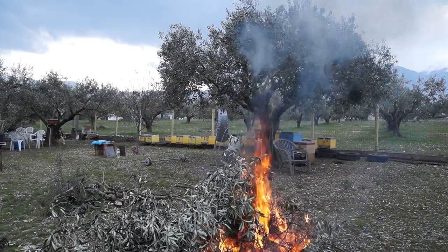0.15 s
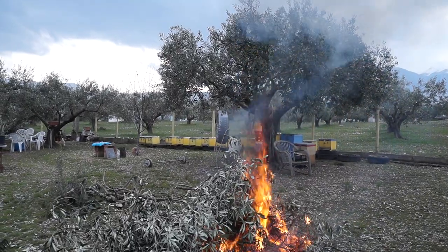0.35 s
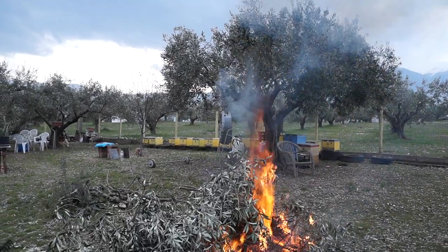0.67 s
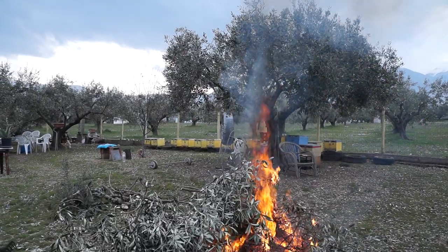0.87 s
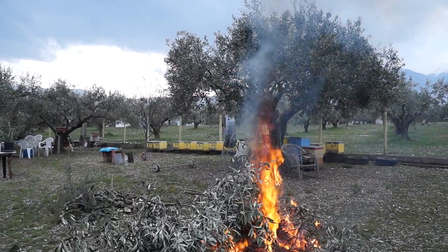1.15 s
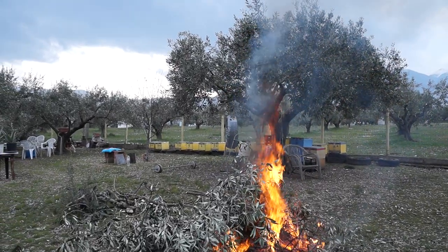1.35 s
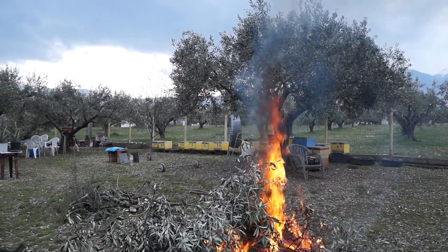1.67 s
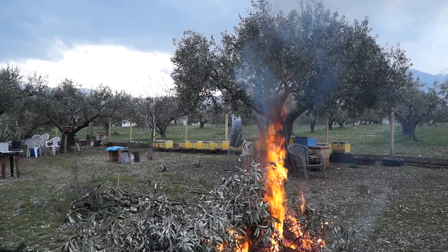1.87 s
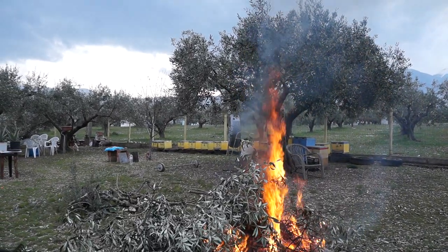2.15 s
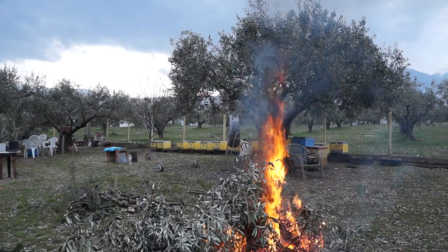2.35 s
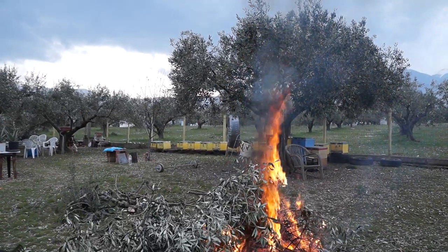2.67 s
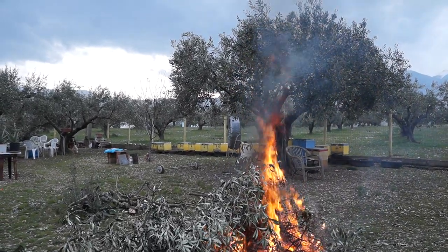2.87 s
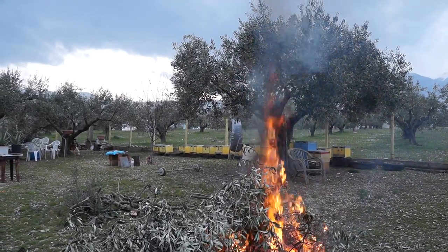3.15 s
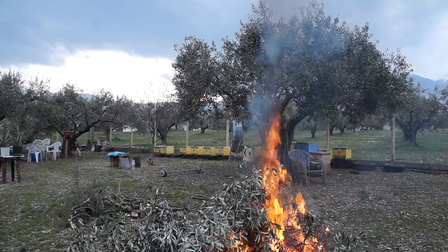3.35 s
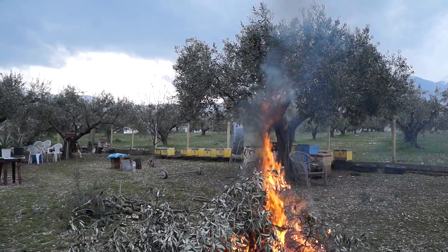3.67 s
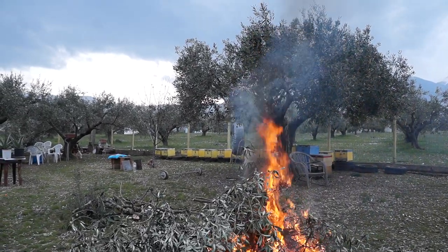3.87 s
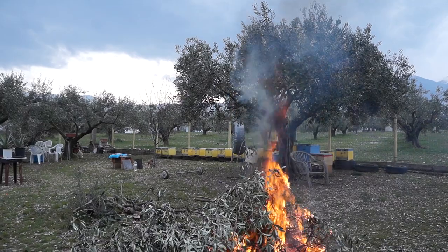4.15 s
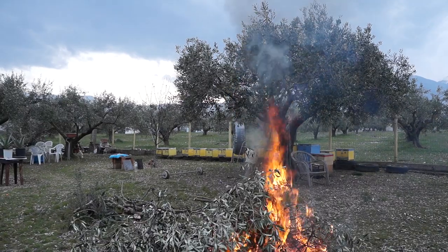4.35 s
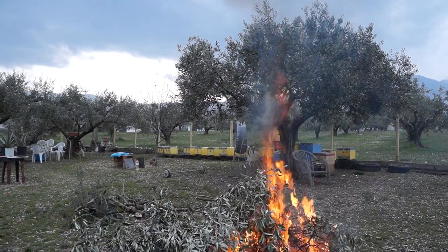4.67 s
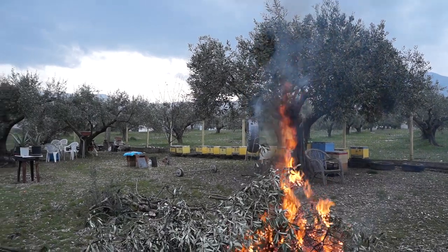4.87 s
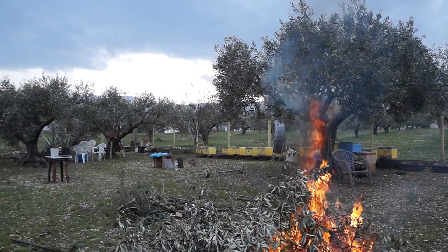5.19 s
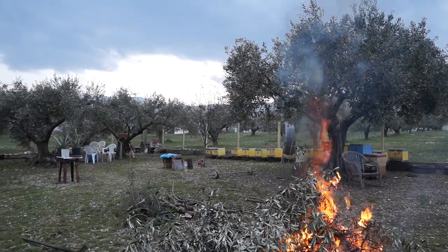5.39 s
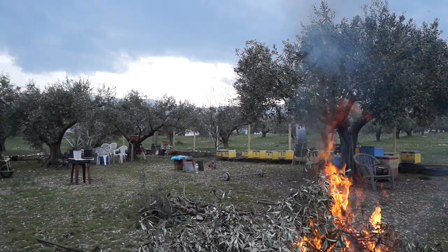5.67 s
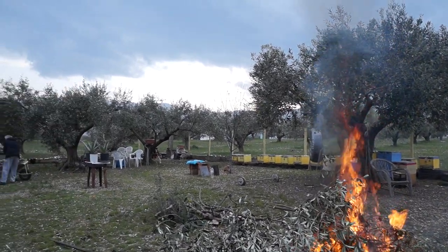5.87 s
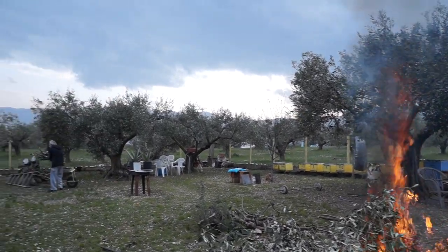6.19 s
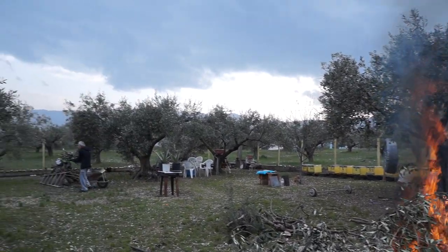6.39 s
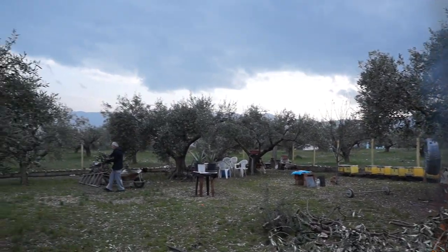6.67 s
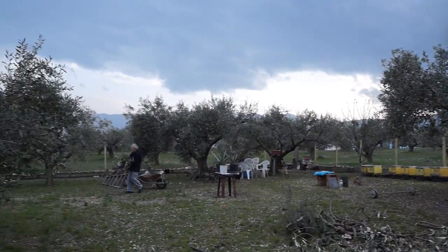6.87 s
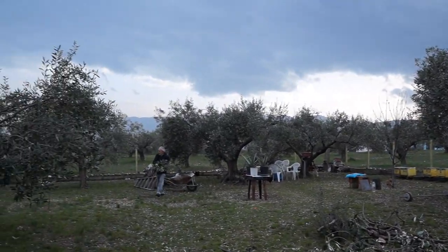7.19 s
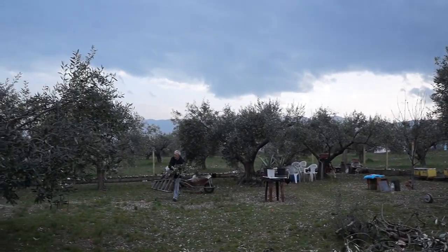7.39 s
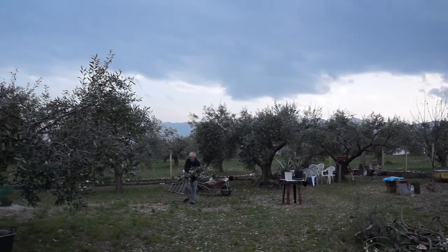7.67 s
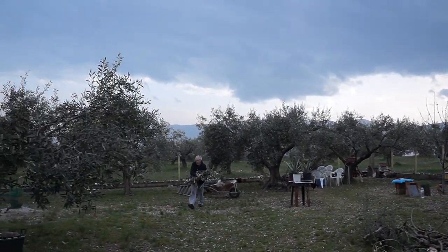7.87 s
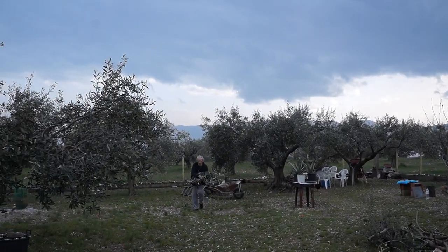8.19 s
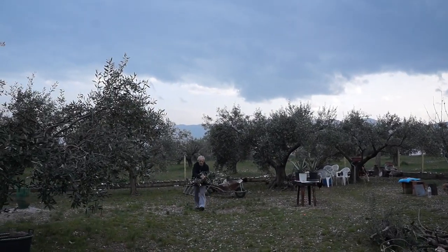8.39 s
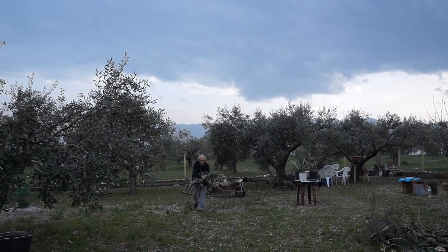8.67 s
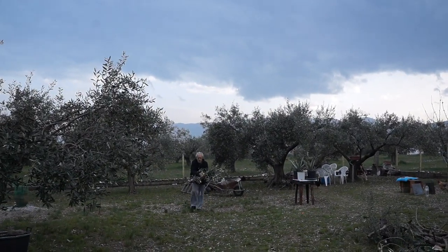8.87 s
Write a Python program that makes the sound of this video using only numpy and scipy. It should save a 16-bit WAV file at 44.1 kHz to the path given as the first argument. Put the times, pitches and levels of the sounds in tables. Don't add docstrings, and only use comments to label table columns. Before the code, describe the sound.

A bonfire of freshly cut leafy branches burns in an orchard, heard in stereo from a few metres away. From 0 to 9 s sharp pops and snaps come irregularly, roughly twenty or more each second, in tight clusters with tiny gaps. Large branch cracks tear on for a few milliseconds, with strong ones near 1.0, 1.7, 2.1, 3.45, 4.4, 5.9, 6.35 and 8.2 s; smaller twigs spit, tick and knock between. Dull thumps fall around 1.45, 4.15, 5.87 and 6.3 s; hollow sticks give very short pitched pings near 1.2, 4.0 and 8.1 s. Behind lies a thin leaf fizz and a faint low roar that swells around 1.5, 4.9 and 7 s. Reflections are brief and diffuse. From about 4 s the sound shifts gently right and the fizz thins as the camera turns left. Tone is bright, ringing near 7.5 kHz, with little above 11 kHz.

```python
import sys
import numpy as np
from scipy import signal
from scipy.fft import rfft, irfft
from scipy.io import wavfile
from scipy.ndimage import uniform_filter1d

SR = 44100
rng = np.random.default_rng(int(sys.argv[2]) if len(sys.argv) > 2 else 0)


def dump(signal):
    limited = np.clip(np.atleast_2d(signal).T, -1, 1)
    pcm = np.round(limited * 32767).astype(np.int16)
    wavfile.write(sys.argv[1], SR, pcm)


def gain_from_db(level_db):
    decades = np.asarray(level_db, float) / 20
    return 10 ** decades


N = 398223

# t/s, energy/dB, woody low part over the crack/dB
LIGHT_TEARS = [(0.14, 1.5, -4), (0.7961, 5, -6.5), (0.9031, 4, -2.5), (1.3627, 5, 3.5), (1.7644, 3, -3.5),
               (1.9188, 1.5, -5), (2.1244, 8.5, -7), (2.1406, 3.5, 0), (2.2759, 8, -3.5),
               (2.5541, 7.0, -5.5), (2.8735, 2.5, -6), (3.0561, 2, -3), (3.2585, 5, -8),
               (3.4556, 4.5, -15), (3.6998, 8.0, -7.5), (3.8728, 4.5, -9.5), (4.4407, 8.5, -16),
               (4.7102, 0.5, -6), (5.0734, 2.5, -2.5), (5.2964, 4.5, -6.5), (5.3492, 5.5, -14),
               (5.5542, 2.5, 2), (5.9615, 7.5, -6.5), (6.0673, 4, -14), (6.1978, 4.5, -1),
               (6.3977, 3.0, -11.5), (6.4621, 5.5, -5), (7.0151, 4, -10), (7.386, 4.5, -9.5),
               (8.7013, 2.5, -12)]
# t/s, energy/dB, woody part/dB
SHARP_BREAKS = [(0.1219, 3.0, -7), (0.3183, 2, -2), (0.3734, 6.5, -5), (0.5923, 7.5, -5), (0.9204, 7, 3),
                (1.1778, 6, -3), (1.2849, 3.5, -8.5), (2.5729, 2.5, -8), (2.6639, 5.5, -3.5),
                (2.8818, 4.0, -9), (3.1103, 3.5, -34), (3.9402, 3, -3), (3.9921, 4.5, -5), (4.0036, 2.5, -10),
                (4.0836, 3.5, -5.5), (4.253, 4, -4), (4.2955, 7.5, -11.5), (5.1809, 5.5, -4),
                (5.2212, 3.5, -4.5), (5.2612, 4, -4), (5.5676, 3, -8), (5.8765, 2, 1), (5.927, 7.5, -6.5),
                (6.3463, 8.5, -7.5), (7.672, 4, -6), (7.7231, 7, 1), (7.8362, 5, -15), (8.2341, 8, -7),
                (8.3711, 5, -9.5), (8.636, 3.5, -8.5)]
# t/s, energy/dB, woody part/dB
RIPS = [(0.0456, 5, -2), (0.3937, 6.0, -4.5), (0.9942, 3.5, -8), (1.0301, 8.5, -9), (1.0716, 2.5, -28),
        (1.6994, 9.5, -12), (1.9315, 3.0, -14), (2.0423, 6.5, -9), (2.9615, 5, -9), (3.1038, 5, -7.5),
        (3.1331, 3.0, -6), (3.4465, 8.5, -8.5), (4.1544, 4, -7), (4.1876, 5, -10), (4.4009, 3, -5),
        (4.9475, 5.5, -7), (5.1483, 5, -5.5), (5.4451, 5, -7.5), (5.5307, 5.5, -9), (5.6585, 3.5, -12),
        (5.6771, 6.5, -6), (5.732, 6, -10), (5.9554, 2.5, -4), (6.5367, 5.5, -7), (6.7098, 3.5, -17),
        (6.9107, 4.5, -8), (7.0529, 2.0, -8.5), (7.0744, 4, -9.5), (8.792, 2.5, -6), (8.9903, 4.5, -8)]
# t/s, energy/dB
TWIG_CRACKS = [(0.1532, -16), (0.4022, -5), (1.7296, 0.5), (2.0498, -8), (2.0722, 0), (2.2042, -4.5),
               (2.4492, 1), (2.6041, -3.5), (3.1981, -4.5), (4.2183, -3), (4.471, -14), (5.5613, -7),
               (5.7743, -4), (5.8429, -2.5), (6.2114, 0), (6.3173, -2), (6.4222, -2), (6.572, 0),
               (7.0456, -9), (7.4335, 2), (7.4417, -2.5), (7.7023, -14), (7.9411, 1.5), (7.9717, -8),
               (8.0056, -0.5), (8.2476, 1), (8.3504, 1), (8.5932, 0.5), (8.8202, -2.5), (8.9429, -2.5)]
# t/s, energy/dB
TWIG_POPS = [(0.0939, -0.5), (0.773, -3.5), (1.0602, -1), (1.2078, -1.5), (1.4297, -4.0), (1.5812, -10),
             (2.1065, -7), (2.1829, -3.0), (2.2344, -5), (2.2876, -1), (2.4775, -3), (2.8421, -5.5),
             (3.5187, -2), (3.5616, 1), (3.6433, -4.5), (3.9097, 0.0), (4.3771, -6), (4.4838, -1.0),
             (6.1545, 0.5), (6.5538, -7), (6.9679, -9), (7.1044, -3.5), (7.352, 2.5), (7.6144, 2.5),
             (7.6396, 0.5), (7.947, 0), (8.7072, 1.5), (8.7292, -1), (8.8702, -4.5), (8.9638, 0.0)]
# t/s, energy/dB
TWIG_SNAPS = [(0.6299, -4.5), (0.8384, -4.5), (0.8916, 1.5), (1.7411, -6), (1.9734, 0), (2.2595, 0.5),
              (2.5851, -8), (2.8688, -2), (3.1185, -14), (3.3347, -1.0), (3.3998, -6), (4.6442, -5.5),
              (4.9722, -3), (5.0991, -1.5), (5.3102, 1.5), (5.4919, -1), (5.6144, -6), (5.7076, -4.0),
              (5.7631, -4.5), (6.0544, -2), (6.098, -11), (6.1307, 0.5), (6.2414, -14), (7.28, -6.5),
              (7.3201, -5.5), (7.6594, -2.0), (8.1024, 0.5), (8.5142, -3.5), (8.5246, -2), (8.766, 1)]
# t/s, energy/dB
TWIG_KNOCKS = [(0.3054, 1), (0.4456, -1.5), (0.5091, -0.5), (0.7092, 1), (0.7894, -11), (1.1629, -5.0),
               (1.2152, 0.5), (1.4453, 1.5), (1.5528, 0.5), (1.6232, 0.5), (1.8829, -0.5), (2.6794, -2.5),
               (2.9304, -4), (2.9993, 4), (3.0977, -4.5), (3.5012, 0), (3.8534, -2.5), (4.0953, -10),
               (4.5561, -10), (4.6581, -5.5), (4.7547, -6.5), (4.8209, -3.5), (5.1725, -1), (5.5998, 1),
               (5.8654, -0.5), (7.5842, 0.5), (7.7536, -1.5), (8.3045, -1), (8.3193, -4), (8.6137, -4.5)]
# events, tearing tail over the shock/dB
BRANCHES = [(LIGHT_TEARS, -5), (SHARP_BREAKS, -7), (RIPS, 2.1)]
# events, woody part over the crack/dB
TWIGS = [(TWIG_CRACKS, -13.5), (TWIG_POPS, -8.5), (TWIG_SNAPS, -5.5), (TWIG_KNOCKS, -1.6)]


def table(rows):
    s, *columns = np.transpose(rows)
    return [np.interp(np.arange(N) / SR, s, column) for column in columns]


def colour(x, points, size=8192):
    hz, db = np.transpose(points)
    bin_hz = np.arange(1, size // 2 + 2) * SR / size
    log_gain = np.log(gain_from_db(np.interp(np.log(bin_hz), np.log(hz), db)))
    cepstrum = irfft(log_gain)
    cepstrum[1:size // 2] *= 2
    cepstrum[size // 2 + 1:] = 0
    response = irfft(np.exp(rfft(cepstrum)))
    response = response / np.linalg.norm(response)
    return signal.oaconvolve(x, response[None], axes=1)[:, :N]


def unit(x):
    return x / np.sqrt(np.mean(x ** 2))


def walk(rate):
    hold = int(SR / rate)
    levels = rng.standard_normal(400)[:N // hold + 1]
    steps = np.repeat(levels, hold)[:N]
    return unit(uniform_filter1d(uniform_filter1d(steps, hold), hold))


def stereo_noise(side_db):
    mid, side = rng.standard_normal((2, N))
    return mid + gain_from_db(side_db) * side * np.array([[1], [-1]])


def bursts(s, db, pan_db, shape):
    lag_s = pan_db * 1.6e-6
    out = []
    for side in (1, -1):
        start = np.clip(np.round((s - side * lag_s / 2) * SR).astype(int), 0, N)
        place = start[:, None] + np.arange(shape.shape[1])
        gain = gain_from_db(db + side * pan_db / 2)[:, None]
        laid = np.bincount(place.ravel(), (shape * gain).ravel(), N + shape.shape[1])
        out.append(laid[:N])
    return np.array(out)


def tearing(tear_db, tear_ms, size=384):
    t = np.arange(size) / SR
    chance = rng.standard_normal((len(tear_db), size + 1))
    decay_ms = tear_ms * np.exp(0.3 * chance[:, -1:])
    tail = chance[:, :size] * np.exp(-t * 1000 / decay_ms)
    tail = tail * np.clip(t * 2000, 0, 1)
    shape = gain_from_db(tear_db)[:, None] * tail / np.linalg.norm(tail, axis=1, keepdims=True)
    shape[:, 0] = 1
    return shape / np.linalg.norm(shape, axis=1, keepdims=True)


def busy_db():
    s = np.array([row[0] for events, _ in BRANCHES + TWIGS for row in events])
    settle_s = 0.033
    keep = np.exp(-1 / (settle_s * SR))
    count = np.bincount((s * SR).astype(int), minlength=N)[:N]
    stir = signal.lfilter([1], [1, -keep], count)
    return 20 * np.log10((stir + 0.53) / np.mean(stir))


def leaves(fizz_db, turn_db, count=6000):
    # f/Hz, level/dB
    fizz_colour = [(410, -37.5), (700, -12), (874, -11.5), (1270, -6.5), (2820, -3.5), (4890, -4.5),
                   (7540, 2), (10600, -9), (11100, -15), (11500, -22), (15000, -30), (22000, -120)]
    when, size, place = rng.random((count, 3)).T
    shape = tearing(6.7 * (place - size), tear_ms=0.9, size=160)
    tick_db = -3.2 * np.log(size + 0.00067)
    ticks = bursts(when * N / SR, tick_db, 9 * (place - 0.5), shape)
    flicker = gain_from_db(1.5 * walk(25))
    blur = gain_from_db(-10.5) * flicker * stereo_noise(side_db=0)
    fizz = unit(colour(unit(ticks) + blur, fizz_colour))
    return fizz * gain_from_db(fizz_db - 2.77 + np.array([turn_db, -turn_db]) / 2)


def shaded(fizz, turn_db):
    lower = signal.sosfiltfilt(signal.butter(2, 3920, fs=SR, output="sos"), fizz)
    shade = np.clip(-0.14 * turn_db, 0, 0.8)
    return fizz - shade * lower


def flames(roar_db):
    # f/Hz, level/dB
    roar_colour = [(12, -41), (20, -14), (87, 1), (227, 1), (310, -1), (472, -12), (562, -14.5),
                   (770, -8.5), (1300, -22.5), (1690, -7), (2860, -120)]
    hz, db = np.transpose(roar_colour)
    fine_hz = np.geomspace(hz[0], hz[-1], num=60)
    curve_db = np.interp(np.log(fine_hz), np.log(hz), db)
    billow_db = 1.4 * walk(16)
    out = 0
    for centre_hz, side_db in ((50, -19), (130, -19.5), (330, -14.0), (750, -6.5)):
        fine_db = curve_db - 7 * np.log2(fine_hz / centre_hz) ** 2
        band = colour(stereo_noise(side_db), np.transpose([fine_hz, fine_db]))
        size = np.sqrt(np.sum(gain_from_db(fine_db) ** 2 * fine_hz))
        out = out + band * size * gain_from_db(billow_db + 1.2 * walk(9))
    return unit(out) * gain_from_db(roar_db + 2.5)


def pop_list(count=70):
    twig_tear_db = 1
    rows = [(*row, tear_db) for events, tear_db in BRANCHES for row in events]
    rows += [(*row, wood_db, twig_tear_db) for events, wood_db in TWIGS for row in events]
    listed = np.transpose(rows)
    when = rng.choice(listed[0], size=count) + 0.0058 + 0.039 * rng.exponential(size=count)
    chance = rng.standard_normal((count, 2)).T
    stalk_db = -6.5 + 2.0 * chance[0]
    stalk_wood_db = -11 + 1.5 * chance[1]
    stalks = [when, stalk_db, stalk_wood_db, np.full(count, twig_tear_db)]
    s, db, wood_db, tear_db = np.hstack([listed, stalks])
    crack_db = db - 10 * np.log10(1 + gain_from_db(wood_db) ** 2)
    return s, crack_db, wood_db, tear_db + 2.0 * rng.standard_normal(len(s))


def bounced(shape, tear_db):
    bounce_s = rng.uniform(0.0012, 0.0024, size=len(shape))
    lag = (bounce_s * SR).astype(int)
    echo = np.zeros(shape.shape)
    echo[np.arange(len(shape)), lag] = -gain_from_db(-11.5 + 0.85 * tear_db) * shape[:, 0]
    both = shape + echo
    return both / np.linalg.norm(both, axis=1, keepdims=True)


def scatter(x, delay_s, t60_s, db, side_db):
    keep = gain_from_db(-120 / (t60_s * SR))
    energy = signal.lfilter([1 - keep], [1, -keep], uniform_filter1d(x ** 2, size=257))
    late = np.roll(energy, int(delay_s * SR), axis=1)
    return x + gain_from_db(db) * np.sqrt(np.abs(late)) * stereo_noise(side_db)


def pops(turn_db):
    # f/Hz, level/dB
    crack_colour = [(1470, -36.5), (2500, -12.5), (4800, -2), (7690, 5), (10600, -6), (11200, -15),
                    (11500, -13.5), (15000, -79), (22000, -120)]
    # f/Hz, level/dB
    wood_colour = [(300, -30.5), (600, -2), (1000, -2.5), (1300, -4), (2200, 2.5), (3200, 4.5), (4200, 3),
                   (7000, -43.5)]
    s, db, wood_db, tear_db = pop_list()
    facing_db = turn_db[np.clip((s * SR).astype(int), 0, N - 1)]
    pan_db = facing_db + 2.5 * rng.standard_normal(len(s))
    bright_db = np.minimum(tear_db + 2, 1)
    dull_db = bright_db - 5
    crack_shape = bounced(tearing(bright_db, tear_ms=2.03), tear_db)
    crack = bursts(s, db + 1.38, pan_db, crack_shape)
    knock_shape = bounced(tearing(dull_db, tear_ms=0.91), tear_db)
    knock = bursts(s, db + wood_db + 2.05, pan_db, knock_shape)
    crack = scatter(crack, delay_s=0.007, t60_s=0.3, db=-9.0, side_db=-9.5)
    knock = scatter(knock, delay_s=0.0035, t60_s=0.24, db=-16.0, side_db=-1)
    return colour(crack, crack_colour) + colour(knock, wood_colour)


def snaps():
    # t/s, peak level/dB
    thick_sticks = [(0.298, -38), (0.902, -27), (1.362, -24), (1.444, -11.5), (1.696, -14.5), (2.121, -25),
                    (3.698, -19), (4.155, -13.5), (5.444, -29), (5.864, -22), (5.872, -6), (6.342, -11.5),
                    (6.909, -15), (7.72, -19), (8.097, -22), (8.233, -39), (8.726, -14.5)]
    # f/Hz, level/dB
    thump_colour = [(60, -28), (200, -11.5), (750, 16.5), (1500, 2), (3000, -30.5)]
    s, db = np.transpose(thick_sticks)
    push = np.ones((len(s), 1))
    return colour(bursts(s + 0.0035, db + 6.5, 0 * s, push), thump_colour)


def rings(turn_db, size=512):
    # t/s, peak level/dB, f/Hz
    hollow_sticks = [(1.1772, -9, 2400), (2.9967, -16, 3120), (3.9402, -10, 2980), (4.0026, -3.5, 3730),
                     (4.4002, -15, 3160), (4.71, -13, 3730), (7.0736, -12, 3660), (7.2799, -14, 4600),
                     (8.1022, -4, 4580), (8.304, -16, 3520), (8.3196, -13, 4660)]
    s, db, hz = np.transpose(hollow_sticks)
    cycles = hz[:, None] * np.arange(size) / SR
    decay_cycles = 2.0
    shape = np.sin(2 * np.pi * cycles) * np.exp(-cycles / decay_cycles)
    return bursts(s, db - 0.5, turn_db[(s * SR).astype(int)], shape)


def scene():
    # t/s, roar level/dB
    roar_level = [(0.0, -40.5), (0.85, -36.5), (1.33, -42.5), (1.53, -33.5), (2.29, -46.5), (2.54, -38.5),
                  (2.59, -44.5), (2.86, -39.5), (4.48, -41.5), (4.88, -33.5), (5.23, -40.5), (6.56, -42.5),
                  (6.96, -36.5), (7.14, -52), (7.37, -41), (7.9, -46.5), (8.98, -41.5), (9.03, -48)]
    # t/s, left minus right level/dB
    camera_turn = [
        (0.0, 0.5),
        (3.9, 0),
        (9.03, -3.5),
    ]
    roar_db, = table(roar_level)
    turn_db, = table(camera_turn)
    fizz_db = -35.5 + 0.26 * (roar_db + 40) + 0.07 * busy_db()
    bursting = pops(turn_db) + rings(turn_db) + snaps()
    fizz = shaded(leaves(fizz_db, turn_db), turn_db)
    return bursting + fizz + flames(roar_db)


def top_cut(x):
    return signal.sosfilt(signal.butter(12, 12340, fs=SR, output="sos"), x)


def record(dry):
    top_hz = 11150
    rounded = 0.88 * np.tanh(dry / 0.88)
    cut = signal.sosfiltfilt(signal.ellip(8, 0.1, 45, top_hz, fs=SR, output="sos"), rounded)
    loudness = uniform_filter1d(np.abs(dry), size=129)
    sudden = np.clip(gain_from_db(21.5) * loudness, 0, 1) ** 2
    above = signal.sosfiltfilt(signal.butter(6, top_hz, "high", fs=SR, output="sos"), dry)
    return top_cut(cut + gain_from_db(-12.5) * sudden * above)


dry = scene()
out = record(dry)
dump(out)
```